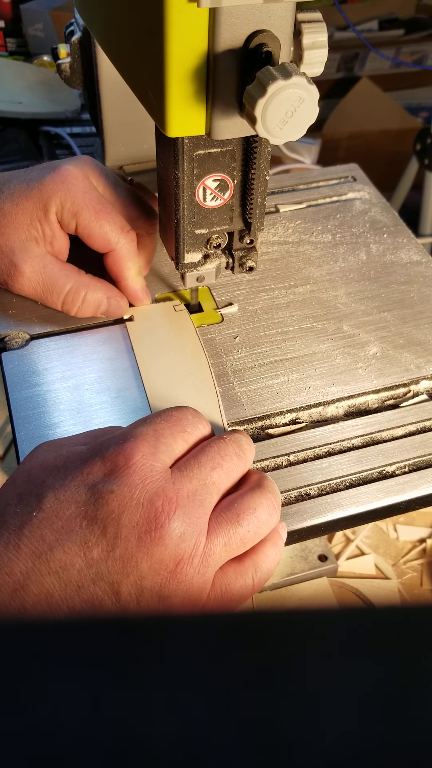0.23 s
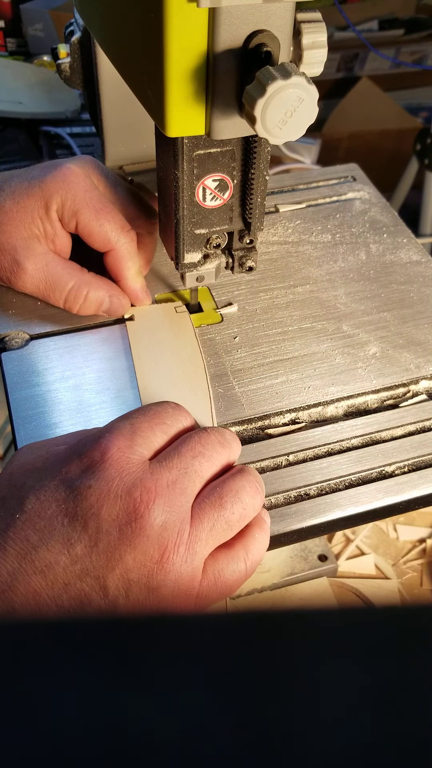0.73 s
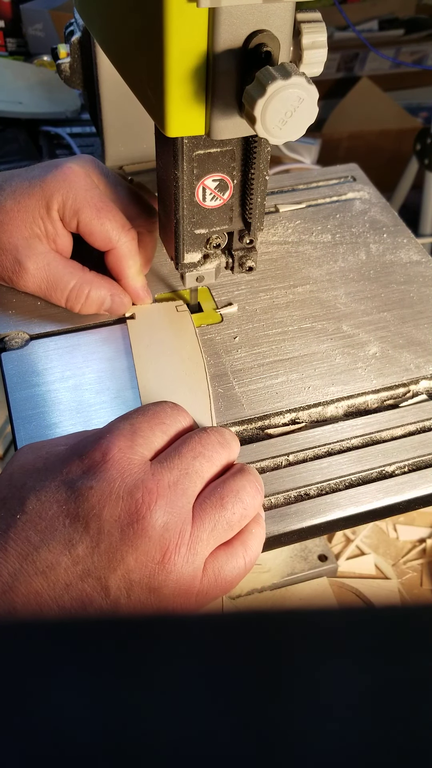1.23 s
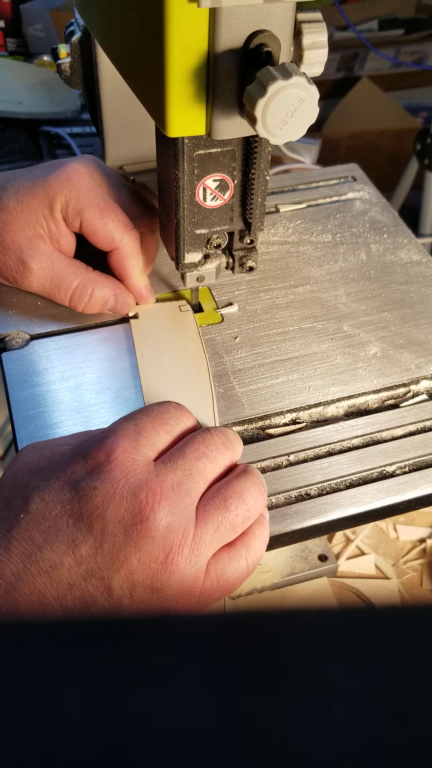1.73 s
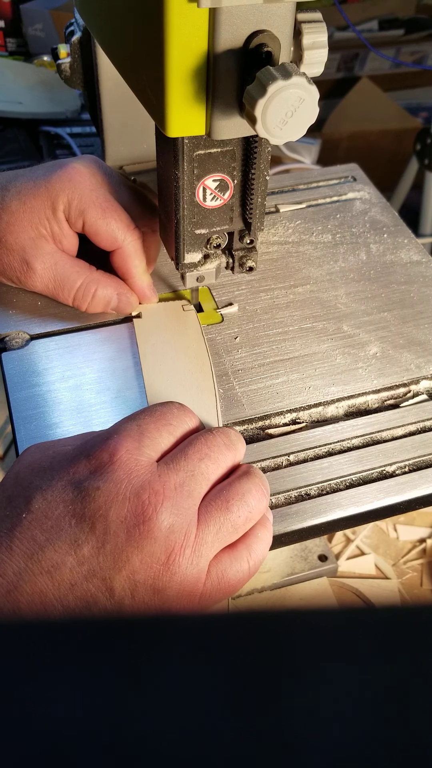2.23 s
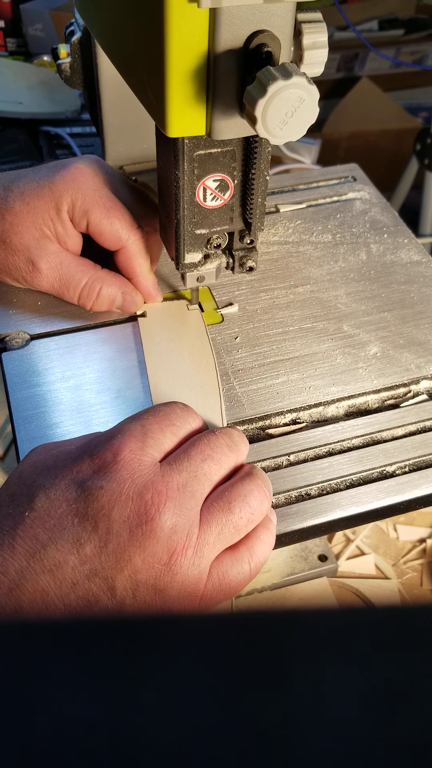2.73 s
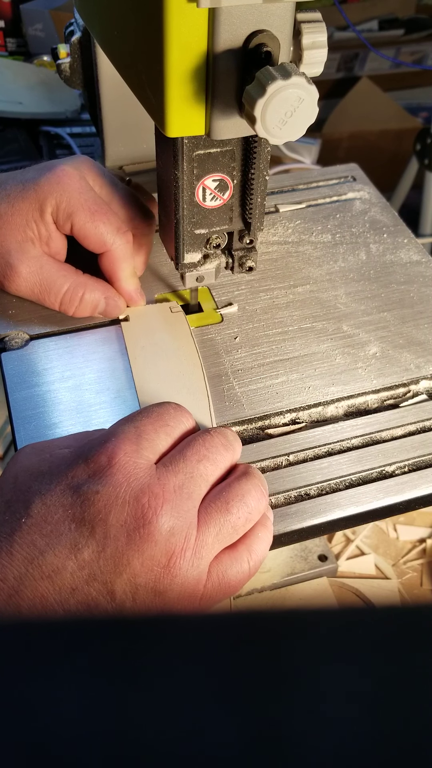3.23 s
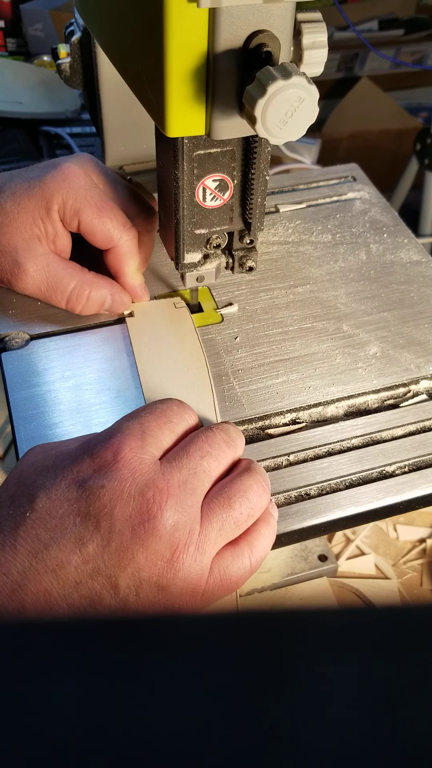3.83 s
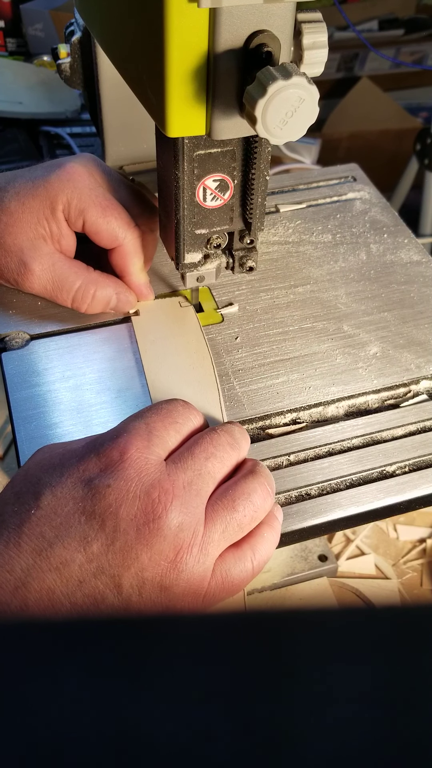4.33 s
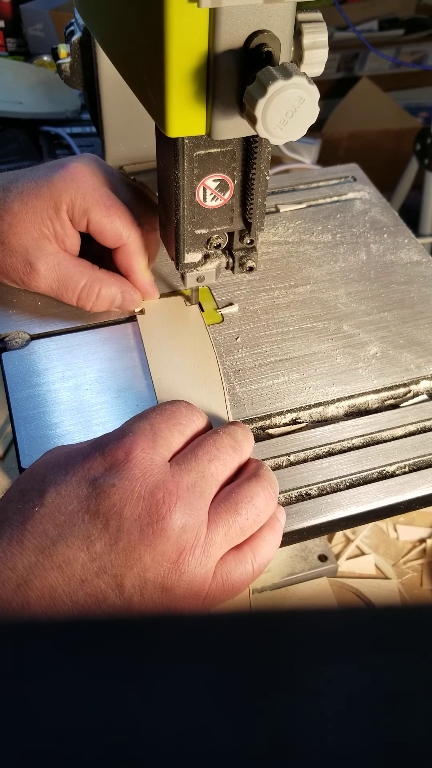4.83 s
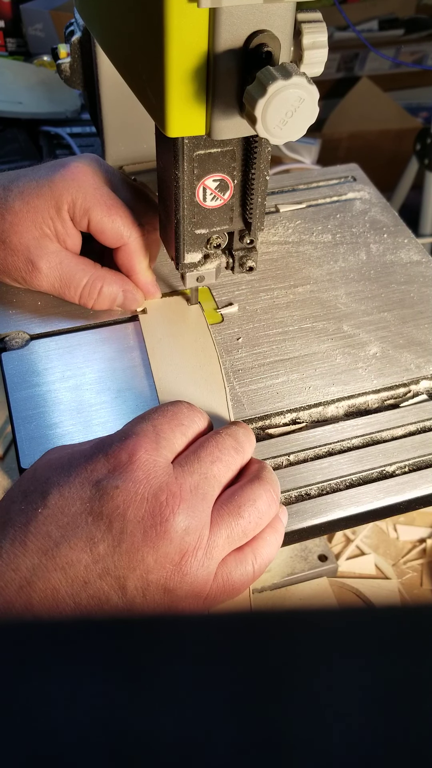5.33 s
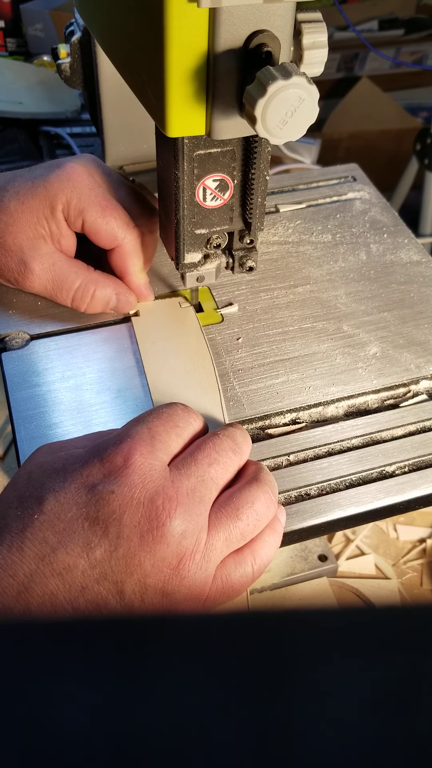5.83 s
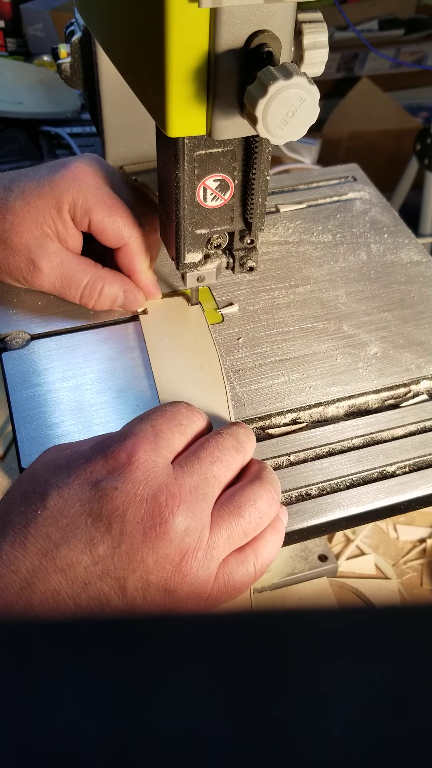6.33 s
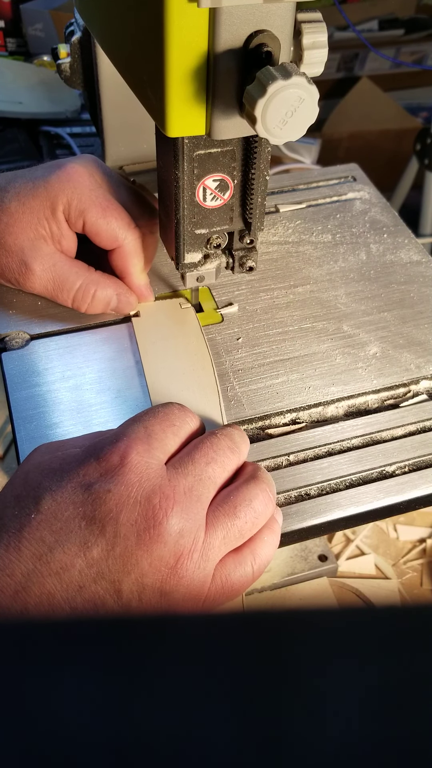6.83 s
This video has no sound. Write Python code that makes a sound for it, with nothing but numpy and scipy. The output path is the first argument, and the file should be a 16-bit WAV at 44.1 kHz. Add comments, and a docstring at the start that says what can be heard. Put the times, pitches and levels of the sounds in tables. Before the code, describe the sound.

Close up in a workshop, a benchtop bandsaw drones steadily while its teeth buzz harshly into plywood, cut after cut, catching and snapping.

```python
"""Plywood cut on a small bandsaw

A small bandsaw idles in a workshop while a hand nudges a plywood edge against the blade in short cuts.
The frame rumbles on the orders of its drive shaft, with motor hum, thin whines and broadband rattle around them.
The teeth rasp at a steady rate, their bite modulated by each turn of the wheels and each lap of the blade;
catches, snapping fibres and low bumps stand out singly. Two microphone ports hear it from close by."""
import sys
import numpy as np
from scipy import signal
from scipy.fft import rfft, irfft, next_fast_len
from scipy.io import wavfile
from scipy.ndimage import uniform_filter1d, minimum_filter1d

SR = 44100
rng = np.random.default_rng(int(sys.argv[2]) if len(sys.argv) > 2 else 0)


def digitize_waveform(pressure):
    """Quantize a signal to 16-bit integers and store it at the path in sys.argv[1].

    Rows of a 2-D input are taken as channels; values are limited to [-1, 1].
    """
    field = np.atleast_2d(pressure).T
    bounded = np.clip(field, -1, 1)
    quanta = np.round(bounded * 32767).astype(np.int16)
    wavfile.write(sys.argv[1], SR, quanta)


N = 311787
T, HZ = np.arange(N) / SR, np.fft.rfftfreq(N, 1 / SR)

WHEEL_HZ, LAP_HZ = 8.525, 2.452  # turns of the wheels and laps of the blade a second
SHAFT_HZ = 2 * WHEEL_HZ  # the shaft turns twice a wheel turn
KINKS_A_LAP = 10  # the blade is evenly kinked

# Plywood rasp, one table a cut; levels are relative to the idling machine. Columns: time_s, level_db
CUTS = [
    [(1.6, -25), (1.69, -5), (1.72, 6), (2.1, 13), (2.55, 12), (3.0, 8), (3.04, -26)],
    [(4.045, -34), (4.085, -6), (4.11, 13), (4.72, 9), (4.98, 7.5), (5.1, 0), (5.3, 1.5), (5.35, -47)],
    [(5.745, -10), (5.77, 9.5), (5.88, 6), (5.96, 7), (6.28, 8.5), (6.33, 4.5), (6.39, 0), (6.4, 0)],
    [(6.72, -32), (6.736, -10), (6.745, -4), (6.78, 17), (6.85, 12.5), (6.93, 15), (7.07, 15)],
]


def gain_of(db):
    """Amplitude ratio of a level in dB."""
    return 10 ** (np.asarray(db) / 20)


def evened(x):
    """Normalization of a signal to rms 1."""
    return x / np.sqrt(np.mean(x ** 2) + 1e-20)


def read(points, hz=HZ):
    """Interpolation of a spectrum table at the frequencies hz, straight on a log frequency axis."""
    f, value = np.transpose(points)
    return np.interp(np.log(hz + 1), np.log(f + 1), value)


def level_at(points):
    """Gain over time, interpolated in dB from a table of time_s, level_db."""
    return gain_of(np.interp(T, *np.transpose(points)))


def shaped(x, gain):
    """Linear filtering: multiplies the spectrum of x by a gain."""
    return irfft(rfft(x) * gain, len(x))


def wobble(hz):
    """Low-passed random fluctuation of rms 1, rolling off around hz."""
    return evened(shaped(rng.standard_normal(N), 1 / (1 + (HZ / hz) ** 2)))


def crests(hz, count, depth, at):
    """Periodic modulation: swells count times a turn, with a crest at a given part of the turn."""
    return depth * np.cos(2 * np.pi * count * (hz * T - at))


def teeth():
    """Impulse-train excitation: a click a tooth with fluctuating grip, plus loose chips and a clean note."""
    tooth_hz, flutter_hz = 2966.8, 416.4  # teeth passing the wood, and a flutter of the blade
    # The kinks sway the teeth to and fro by up to 0.1 of a tooth spacing
    places = tooth_hz * T + crests(LAP_HZ, KINKS_A_LAP, 0.1, 0.03)
    passed = np.floor(places + 0.065 * wobble(hz=77.3))
    hit = np.diff(passed, prepend=0) > 0
    flutter = np.cos(2 * np.pi * flutter_hz * T)
    grip = 0.46 + 0.78 * wobble(hz=584) + 0.32 * flutter
    clicks = evened(shaped(hit * grip, HZ > 600))

    chips = 1.5 * rng.standard_normal(N) * gain_of(0.8 * wobble(hz=300)) * (1 + 0.35 * flutter)

    # Fibres breaking at random; levels are relative to the clicks
    splinters_per_s, splinter_db, spread_db = 700, 12, 2
    size_db = splinter_db + spread_db * np.minimum(rng.exponential(1, N), 3)
    splinters = (rng.random(N) < splinters_per_s / SR) * gain_of(size_db)

    note_db, note_flutter = -11.5, 0.55
    note = np.cos(2 * np.pi * (places + 0.075 * wobble(hz=2.9))) * (1 + note_flutter * flutter)
    return clicks + chips + splinters + gain_of(note_db) * note


def contact(drive, crackle_db, bite_db, rows, tone, colour, rings):
    """Source-filter radiation of one touch of wood on blade, in bands for plywood, blade and tooth tips."""
    # Sudden catches of the teeth, relative to the idling machine. Columns: start_s, level_db, t60_s
    catch_rows = [(1.608, 12, 0.058), (1.646, 8.5, 0.064), (1.671, 17.5, 0.014), (1.678, 13, 0.024),
                  (1.7, 13, 0.054), (1.706, 19, 0.1), (1.725, 24, 0.045), (1.822, 23, 0.084),
                  (1.85, 41, 0.026), (2.2235, 23, 0.067), (2.579, 18, 0.033), (2.697, 21, 0.03),
                  (2.821, 21.5, 0.06), (2.871, 12, 0.029), (2.948, 24, 0.037), (3.1315, 18.5, 0.076),
                  (4.05, 20.5, 0.035), (4.059, 17, 0.057), (4.086, 15, 0.023), (4.098, 20, 0.053),
                  (4.178, 15, 0.038), (4.3, 25, .02), (4.333, 37, 0.034), (4.3968, 22.5, 0.028),
                  (4.459, 7, 0.03), (4.669, 29, 0.018), (4.7506, 17, 0.048), (5.036, 22.5, 0.046),
                  (5.1332, 10, .045), (5.158, 12, 0.064), (5.193, 12, 0.11), (5.28, 17, 0.035),
                  (5.3154, 24.5, 0.015), (5.767, 26, 0.042), (5.927, 14, 0.056), (5.984, 16.5, 0.13),
                  (6.106, 16, 0.19), (6.243, 16.5, 0.16), (6.047, 8, 0.033), (6.726, 22.5, 0.01),
                  (6.738, 26.5, 0.2), (6.802, 29, .03), (6.853, 26, 0.027), (6.915, 23, .03),
                  (6.93, 17, 0.036), (7.0332, 26, 0.046)]
    catch_rise_s = 0.0018
    loosening = 1.46  # the bite swings this much deeper by the end
    fizz_bite = 0.19  # extra share of the bite swing heard in the tooth fizz

    s, db = np.transpose(rows)
    span = (T > s[0] - 0.01) & (T < s[-1] + 0.09)  # leaves room for the last catch to decay
    t = T[span]
    hz = np.fft.rfftfreq(len(t), 1 / SR)
    rasp_db = np.interp(t, s, db)
    ring_db, fizz_db = (np.interp(t, s[[0, -1]], ends) for ends in np.reshape(tone, (2, 2)))
    swing = np.interp(t, s[[0, -1]], (1, loosening))
    feed = (t < s[-1]) * gain_of(rasp_db + swing * bite_db[span])
    catches = sum(gain_of(peak_db - 60 * abs(t - at) / t60) * np.clip((t - at) / catch_rise_s, 0, 1)
                  for at, peak_db, t60 in catch_rows if s[0] < at < t[-1])

    boost_db = sum(boost / (1 + (2 * (hz - f) / width) ** 2) for f, width, boost in rings)
    sound = shaped(drive[span], gain_of(read(colour, hz) + boost_db))
    above_wood = 1 / (1 + (4100 / (hz + 1)) ** 12)
    above_ring = 1 / (1 + (9500 / (hz + 1)) ** 12)
    wood = evened(shaped(sound, 1 - above_wood))
    ring = evened(shaped(sound, above_wood - above_ring))
    fizz = evened(shaped(sound, above_ring))
    fizz = evened(fizz * gain_of(crackle_db[span])) * gain_of(fizz_bite * bite_db[span])
    blend = wood + gain_of(ring_db) * ring + gain_of(fizz_db) * fizz

    # Catches are set by the level of the whole blend, the feed by its plywood band
    loudness = np.sqrt(1 + gain_of(2 * ring_db) + gain_of(2 * fizz_db))
    out = np.zeros(N)
    out[span] = blend * np.hypot(feed, catches / loudness)
    return out


def cut():
    """Amplitude modulation by rotation: cuts pulse with the wheels and the blade lap; rubs only waver."""
    # Wood brushing the side of the blade between cuts, relative to the idling. Columns: time_s, level_db
    rubs = [
        [(3.02, -5.5), (3.08, 6.5), (3.12, -7), (3.16, 9.5), (3.19, -15), (3.23, -28)],
        [(5.33, -21), (5.39, -6.5), (5.43, 9), (5.48, 0.5), (5.5, 7), (5.545, 9), (5.555, -7.5), (5.62, -22)],
        [(6.485, -59), (6.489, 3), (6.5, -30), (6.52, -15)],
    ]
    # Band levels over the plywood rasp; each cut dulls as the blade sinks in.
    # Columns: ring_entry_db, ring_exit_db, fizz_entry_db, fizz_exit_db
    cut_tones = [(-3.3, -6.5, -4, -7.5), (-1.5, -8.5, 5, -1), (1.5, -12.5, -7, -11), (1, -9.5, -1, 0)]
    # The same band levels for the rubs. Columns: ring_entry_db, ring_exit_db, fizz_entry_db, fizz_exit_db
    rub_tones = [(-20, 10.3, 2.9, 9.9), (-6, 6.2, 9.6, 13), (13.5, 6, 2.5, 2.1)]
    # Relative spectral density of each cut, as the piece is held differently. Columns: freq_hz, level_db
    cut_colours = [
        [(470, -8.5), (800, -9), (942, -10.5), (1150, -0.5), (1350, -3), (1880, -1), (2950, 12), (4030, -4.5),
         (5510, -15.5), (6090, -6.5), (6650, -16), (9450, -25), (11600, -21.5), (14800, -18), (16000, -22)],
        [(470, -1.5), (800, -7), (1370, 1), (2290, 3.5), (2950, 12.5), (4130, -12), (5800, -26.5),
         (8030, -25.5), (8660, -22), (11100, -11), (11900, 0), (12900, -1.5), (13500, -13), (13900, -11),
         (14500, 7), (15400, 1), (16000, -2.5)],
        [(470, -25), (800, -32), (1190, -17), (1480, -26.5), (1830, -22), (1950, -14.5), (2600, -16),
         (3020, -7.5), (4180, -14), (4800, -0.5), (5510, -8.5), (6910, -1.5), (11000, -7), (14800, 4),
         (16000, -14)],
        [(470, -45), (800, -29), (1030, -33), (1090, -20.5), (1880, -21), (2950, -3.5), (3880, -11.5),
         (4340, -7), (5940, -5), (11000, -5), (15000, -1), (16000, 1.5)],
    ]
    # Relative spectral density of the rubs. Columns: freq_hz, level_db
    rub_colour = [(880, -53), (1500, -17), (1920, -16), (3060, -8), (3770, -10), (4780, -2), (5440, -11),
                  (5940, -3), (9370, -8), (12600, 0.5), (15200, -2), (16000, 1.5)]
    # Narrow rings and hollows of each cut. Columns: freq_hz, width_hz, boost_db
    cut_rings = [
        [(2925, 110, 5), (2680, 80, -5), (2810, 60, -4), (2300, 60, -6), (3370, 60, 1), (2551, 14, 6),
         (2420, 60, 5), (2740, 60, 4), (3200, 40, 5), (2490, 60, -5), (3060, 60, -4), (3300, 120, -4),
         (3600, 80, -6), (5930, 60, 9), (9700, 500, -5), (10400, 400, 5), (11850, 200, 4), (14420, 60, 6),
         (15500, 600, -7)],
        [(2940, 150, 5), (2680, 40, -6), (5926, 50, 8), (5950, 350, 7), (3024, 25, 5), (3570, 200, -8),
         (8870, 120, 6), (10400, 500, 6), (13300, 700, 9), (14800, 100, 5), (15250, 300, -4), (15600, 400, -11),
         (12200, 150, -5), (14480, 150, -4)],
        [(1978, 16, 14), (2380, 50, 5), (2890, 60, 5), (3120, 120, 6), (4000, 150, 8), (4930, 100, 4),
         (6940, 150, 6), (7780, 70, 5), (10200, 250, 5), (11900, 100, 5), (14830, 150, 7)],
        [(2960, 150, 4), (3550, 300, -4), (5925, 50, 7), (7900, 100, 4), (8880, 120, 6), (11860, 150, 7),
         (14000, 500, -6), (14800, 150, 7), (15500, 400, -8)],
    ]
    # Bite swells of the out-of-round wheels. Columns: depth_db, crest_turns (part of a wheel turn)
    swells = [(0.44, 0.97), (1.37, 0.12), (1, 0.064), (-0.5, .001)]
    swells_a_turn = (1, 2, 4, 6)

    drive, waver_db = teeth(), 0.14 * wobble(hz=45.7)
    crackle_db = 3.7 * wobble(hz=320)  # the tooth fizz flickers quickly
    swing_db = crests(LAP_HZ, KINKS_A_LAP, 1.5, 0.039)
    swing_db = swing_db + sum(crests(WHEEL_HZ, k, *row) for k, row in zip(swells_a_turn, swells))

    # Once a shaft turn the teeth ease off, then grip again (parts of a turn)
    slip_db, slack_at, ease_part, regrip_part = -7.5, 0.874, 0.08, 0.018
    past = (SHAFT_HZ * T - slack_at + 0.5) % 1 - 0.5
    swing_db = swing_db + slip_db * np.exp(-(past / np.where(past < 0, ease_part, regrip_part)) ** 2)

    # Full teeth bite no deeper: upward swings saturate towards 4 dB
    bite_db = np.where(swing_db > 0, 4 * np.tanh(swing_db / 4), swing_db) + waver_db
    cuts = sum(contact(drive, crackle_db, bite_db, *parts)
               for parts in zip(CUTS, cut_tones, cut_colours, cut_rings))
    brushes = sum(contact(drive, crackle_db, waver_db, *parts, rub_colour, [])
                  for parts in zip(rubs, rub_tones))
    return cuts + brushes


def snaps():
    """Impulsive fracture: each fibre snapping on a tooth is a bright noise burst that dies at once."""
    # Onset of each burst before colouring, relative to the idling machine. Columns: start_s, level_db
    snap_rows = [(1.6112, 8), (1.646, 19), (1.678, 22.5), (1.684, 12), (2.5037, 9), (2.993, 11),
                 (3.0007, 10), (3.066, 26), (3.0824, 15), (3.0926, 27), (3.146, 29), (3.1598, 24),
                 (3.164, 29), (3.178, 16), (4.051, 23), (4.057, 31), (4.088, 21), (4.099, 28), (4.1702, 21),
                 (4.301, 26), (4.4004, 28), (4.407, 25), (4.46, 21), (4.469, 19), (4.483, 23), (4.584, 29),
                 (4.64, 28), (4.828, 17), (4.9466, 27), (4.963, 27), (5.0402, 28), (5.0776, 25),
                 (5.1354, 21), (5.178, 24), (5.195, 29), (5.2165, 23), (5.2367, 25), (5.2853, 23),
                 (5.3166, 21), (5.346, 9), (5.3648, 13), (5.375, 21.5), (5.769, 32), (5.7762, 21),
                 (5.8136, 17), (5.9287, 27), (5.9854, 22), (6.108, 11), (6.2562, 27), (6.489, 25),
                 (6.7263, 23), (6.939, 32), (7.0663, 37)]
    # Relative spectral density of a snap. Columns: freq_hz, level_db
    snap_colour = [(800, -13), (2500, -15.5), (6000, -7.5), (9000, -11.5), (12000, 0.5), (15000, -6.5)]
    t60_s = 0.004
    out, t = np.zeros(N), np.arange(600) / SR
    bursts = rng.standard_normal((len(snap_rows), len(t)))
    for (s, db), noise in zip(snap_rows, bursts):
        part = out[round(s * SR):][:len(t)]
        part += (gain_of(db - 60 * t / t60_s) * noise)[:len(part)]
    return shaped(out, gain_of(read(snap_colour)))


def bumps():
    """Heavily damped impulse response: wood bumping the table gives one low push without a ring."""
    # Scale of each push, relative to the idling machine. Columns: start_s, level_db, direction (+1 or -1)
    bump_rows = [(4.313, 4, 1), (5.452, 14, 1), (5.51, 19, -1), (5.528, 16, 1), (5.77, 17, -1),
                 (6.759, 12.5, 1)]
    bump_hz = 154
    out = np.zeros(N)
    for s, db, way in bump_rows:
        u = np.clip((T - s) * bump_hz * 2 * np.pi, 0, 40)
        out += np.sign(way) * gain_of(db) * u * (2.6 - u) * np.exp(-u)
    return out


def tones():
    """Harmonic series of a rotating shaft, with motor hum beating against one order, and thin whines."""
    # Shaft orders, levels relative to each other. Columns: order (multiple of shaft rate), level_db
    shaft_orders = [(1, -45), (2, -28), (3, -28), (4, -40), (5, -28), (6, -22), (7, -1), (8, -19), (9, -2),
                    (10, -9), (11, -14), (12, -22), (13, -18), (14, -17), (15, -6), (16, -5), (17, -10),
                    (18, -6), (19, -3), (20, -1), (21, -1), (22, -4), (23, -4), (24, -13), (25, -7),
                    (26, -9), (27, 0), (28, -1), (29, -9), (30, -4), (31, -10), (32, 0), (33, -3), (34, -7),
                    (35, -13), (36, -16), (37, -16), (38, -14), (39, -8), (40, -20), (41, -14), (42, -10),
                    (43, -10), (44, -6), (47, -8), (51, -11), (54, -13), (55, -14), (56, -16), (58, -16),
                    (60, -15), (62, -11), (64, -10), (65, -13), (66, -14)]
    # Thin whines of bearings and guides, rms relative to the idling machine. Columns: pitch_hz, level_db
    whines = [(867, -32), (1658, -24), (1739, -31), (2116, -35), (2406, -29.5), (3096, -29), (3360, -38),
              (6047, -25)]
    order_waver = 0.35  # depth of each order's slow waver

    turns = SHAFT_HZ * T + 0.0034 * wobble(hz=0.73)
    draws = rng.random((len(shaft_orders), 3))
    orders = np.zeros(N)
    for (k, db), (phase, rate, start) in zip(shaft_orders, draws):
        if k != 7:  # the seventh joins the hum below
            waver = 1 + order_waver * np.cos(2 * np.pi * ((1 + 3.5 * rate) * T + start))
            orders += gain_of(db) * np.cos(2 * np.pi * (k * turns + phase)) * waver

    # Motor hum at twice the mains beats with the seventh order; near in_step_s the two add up
    mains_hz, in_step_s = 120.04, 0.99
    seventh_db, mains_db = -16, -20  # rms
    seventh = np.cos(2 * np.pi * 7 * turns)
    mains = np.cos(2 * np.pi * (mains_hz * (T - in_step_s) + 7 * SHAFT_HZ * in_step_s))
    hum = np.sqrt(2) * (gain_of(seventh_db) * seventh + gain_of(mains_db) * mains)

    whine = gain_of(-12.5) * np.cos(2 * np.pi * 45.5 * turns)  # a steady whine between two orders
    for hz, db in whines:
        whine = whine + np.sqrt(2) * gain_of(db) * np.cos(2 * np.pi * (hz * T + 0.11 * wobble(hz=5.6)))
    return whine + gain_of(-4.5) * evened(orders) + hum


def rattle(chatter):
    """Noise-excited resonance: broad rattle and ringing of the frame, with one ring added under load."""
    # Relative spectral density of the broad rattle. Columns: freq_hz, level_db
    frame = [(24, -14), (60, -19), (133, 7.5), (209, -1), (345, -26), (542, 13), (630, -16), (770, -23),
             (1410, -3.5), (3060, -3), (3700, -10), (4130, -14.5), (5300, -19.5), (6170, -5), (7300, -14),
             (8990, -22), (11400, -14), (12500, -8), (16000, -12.5)]
    # Resonances of the frame, levels relative to each other. Columns: freq_hz, width_hz, level_db
    frame_rings = [(335, 70, -4), (550, 35, -12), (745, 25, -11), (800, 20, -12), (865, 12, -17),
                   (1080, 120, -10), (1570, 30, -19), (1665, 45, -13.5), (1740, 20, -21), (2420, 55, -18),
                   (3060, 150, -14), (6045, 50, -11), (6360, 90, -18), (895, 10, -15), (1184, 20, -17),
                   (4950, 300, -21), (7500, 200, -24), (11030, 44, -23)]
    loaded_hz = 716

    rings = sum(gain_of(2 * db) / (1 + (2 * (HZ - hz) / width) ** 2) / width for hz, width, db in frame_rings)
    noise = rng.standard_normal(N) * chatter
    broad = evened(shaped(noise, gain_of(read(frame))))
    # Reversing the noise decorrelates the ringing from the rattle
    ringing = evened(shaped(noise[::-1], np.sqrt(rings) / (1 + (190 / (HZ + 1)) ** 4)))
    cutting = sum((T > rows[0][0]) * (T < rows[-1][0]) * 1. for rows in CUTS)
    loaded = uniform_filter1d(cutting, size=3000)
    strain = loaded * evened(shaped(noise, 1 / (1 + ((HZ - loaded_hz) / 9) ** 2)))
    return gain_of(-10.0) * strain + gain_of(-10.0) * broad + gain_of(-6.0) * ringing


def ports(x, lean, likeness, apart=None):
    """Interaural-style phase, level and coherence: direct sound shared, scattered sound unlike at each port.

    The scattered part is apart if given, or else reflections of x."""
    # Phase lead of the left port over the right. Columns: freq_hz, lead_rad
    lead = [(0, 0), (1890, 1.6), (2410, 0.7), (2900, 2.0), (2940, 2.3), (2967, 3.1), (3000, 2.5),
            (3060, 2.4), (3360, 2.3), (4050, 3.14), (4500, 3.2), (5860, 4.7), (7200, 6.7), (8200, 9.4),
            (8960, 11.9), (10400, 14.4), (11800, 12.8), (12500, 17.5), (13800, 18.5), (14600, 26.5),
            (15700, 28.3), (16000, 28.7)]
    size = next_fast_len(N + 4000)
    hz = np.fft.rfftfreq(size, 1 / SR)
    if apart is None:
        decay_db = -60 * np.arange(3000) / SR / 0.018  # t60 of 18 ms
        tails = rng.standard_normal((2, 2, 3000)) * gain_of(decay_db)
        tails = rfft(tails / np.linalg.norm(tails, axis=2)[..., None], size)
        turn = 2 * wobble(hz=12)  # drifts between two sets of reflections
        scattered = tails[0] * rfft(x * np.cos(turn), size) + tails[1] * rfft(x * np.sin(turn), size)
    else:
        scattered = rfft(apart, size)
    same = np.clip(read(likeness, hz), 0, 1)
    sign = np.array([[0.5], [-0.5]])  # half of each difference goes to either port
    direct = rfft(x, size) * np.exp(1j * sign * np.interp(hz, *np.transpose(lead)))
    both = gain_of(sign * read(lean, hz)) * (np.sqrt(same) * direct + np.sqrt(1 - same) * scattered)
    return irfft(both, size)[:, :N]


def scene():
    """Superposition of machine, cuts, snaps and bumps at the two ports."""
    # Level of the left port over the right for the wood. Columns: freq_hz, difference_db
    cut_lean = [(60, 2.5), (200, 9), (700, 23), (1400, 2.5), (2000, 10.5), (2500, -1), (2967, 1),
                (3600, 2.5), (4050, 3), (4500, -6.5), (5500, -1.5), (5930, -6.5), (6400, -5.5),
                (7400, 10.5), (8300, 10.5), (9000, 2.5), (9800, 9), (11500, -4), (12200, -13.5), (13500, 2),
                (14100, -4), (14800, -5), (15700, -19)]
    # Level of the left port over the right for machine and bumps. Columns: freq_hz, difference_db
    idle_lean = [(30, 19), (60, 24), (110, 2.5), (200, 3.5), (380, 4), (700, 4), (1290, 3.5), (2380, 6),
                 (3100, 0), (4400, 1.5), (5400, -6), (6050, -3.5), (7000, 3), (7500, -6), (8200, 9),
                 (9500, 6), (11400, 0.5), (12400, -8), (13300, 0), (14000, -2), (14700, -1), (15600, 5)]
    # Likeness of the ports for the wood. Columns: freq_hz, shared_power (0 to 1)
    cut_same = [(30, 0.92), (100, 0.99), (300, 0.9), (800, 0.9), (1500, 0.8), (2800, 0.86), (2967, 0.95),
                (3150, 0.8), (3600, 0.6), (4050, 0.98), (4500, 0.8), (5500, 0.7), (6000, .9), (6800, .95),
                (8500, 0.6), (11500, 0.7), (15000, 0.8)]
    # Likeness of the ports for the frame rattle. Columns: freq_hz, shared_power (0 to 1)
    idle_same = [(60, .93), (100, .99), (160, 0.66), (270, 0.73), (450, 0.8), (740, 0.67), (1220, 0.17),
                 (2010, 0.17), (3330, 0.09), (15000, 0.075)]
    # Bass of machine and bumps, weaker in the later cuts. Columns: time_s, level_db
    bass_level = [(0, -1), (4.1, -1.5), (4.5, -5), (7.07, -3.5)]
    bass_hz = 275
    # Overall level: it sinks through the first cut and rises and falls a little after. Columns: time_s, level_db
    heard = [(0, -27), (.2, -29), (.81, -26), (1.66, -26.5), (2.09, -32.5), (3.0, -37), (3.21, -39),
             (3.6, -35.5), (4.1, -37), (4.73, -40), (5.9, -40.5), (6.26, -38.5), (6.61, -40), (7.07, -38.5)]

    steady = ports(tones() + bumps(), idle_lean, [(0, 1), (1, 1)], np.zeros((2, N)))
    chatter = gain_of(2 * wobble(hz=30))  # random level swing of 2 dB rms
    apart = np.array([rattle(chatter), rattle(chatter)])
    machine = steady + ports(rattle(chatter), idle_lean, idle_same, apart)
    bass = irfft(rfft(machine) / (1 + (HZ / bass_hz) ** 8), N)
    machine = machine + (level_at(bass_level) - 1) * bass

    wood = shaped(cut(), 1 - 1 / (1 + (HZ / 350) ** 4))
    wood = ports(wood, cut_lean, cut_same)
    wood = wood + ports(snaps(), cut_lean, [(0, 0.9), (1, 0.9)])  # a snap comes from one spot
    return level_at(heard) * (machine + wood)


def record(dry):
    """Peak limiting, then linear filtering: a high-pass drops the deepest bass, a low-pass limits the band."""
    ceiling, edge_hz = 0.85, 15720  # peak at which the limiter holds, and the top of the band
    room_left = minimum_filter1d(np.minimum(1, ceiling / (abs(dry).max(0) + 1e-9)), size=81)
    limited = dry * uniform_filter1d(room_left, size=81)
    held = signal.sosfilt(signal.butter(1, 55, "high", fs=SR, output="sos"), limited)
    band = signal.firwin(1023, edge_hz, window=("kaiser", 9), fs=SR)
    return signal.oaconvolve(held, band[None], "same")


dry = scene()
out = record(dry)
digitize_waveform(out)
```